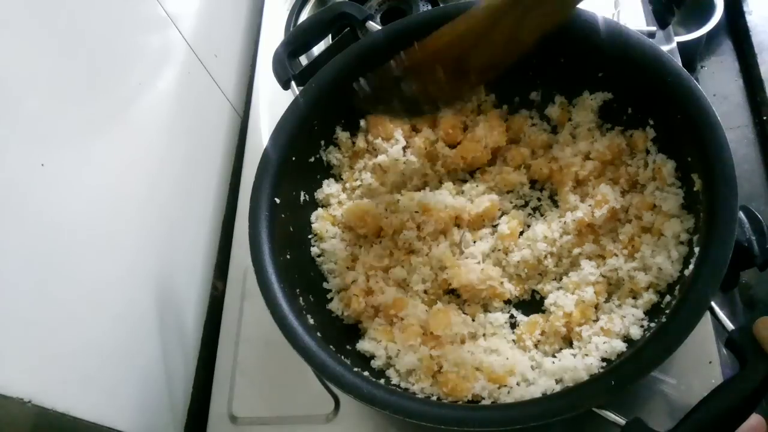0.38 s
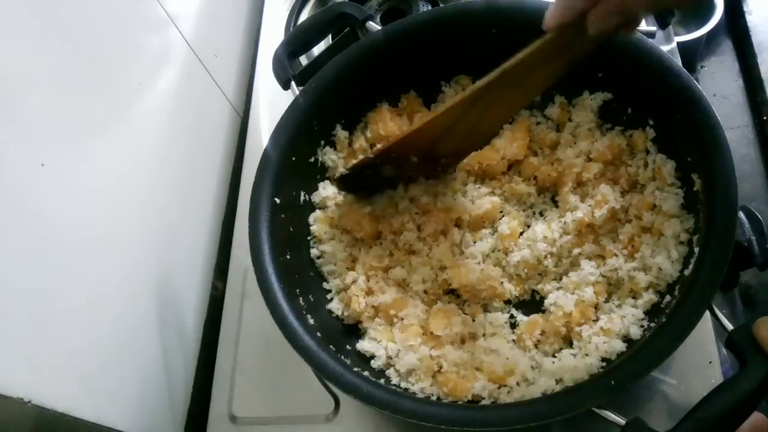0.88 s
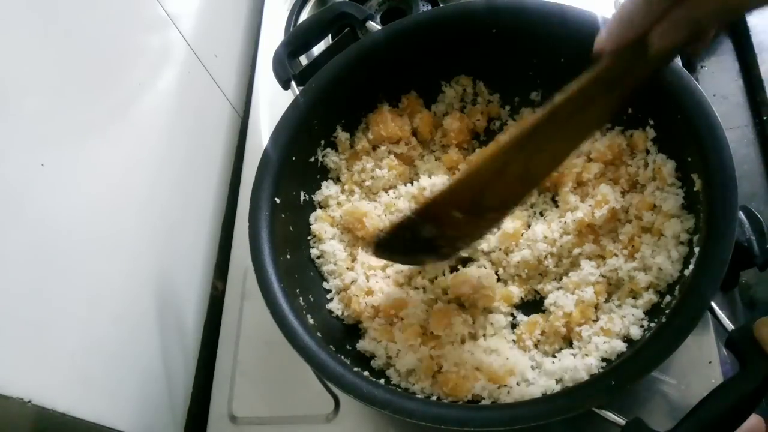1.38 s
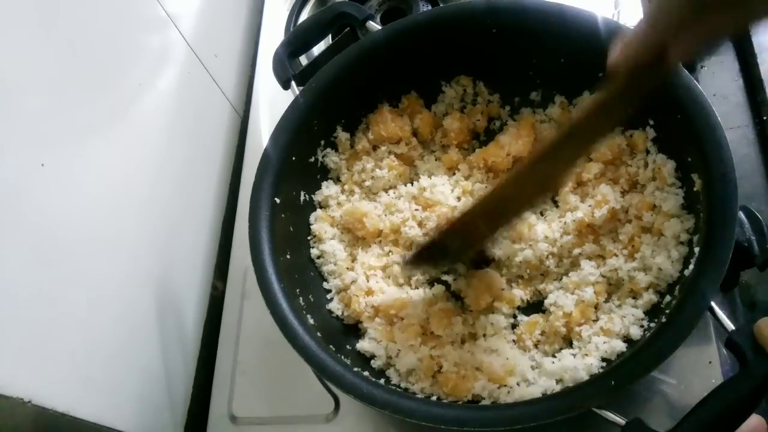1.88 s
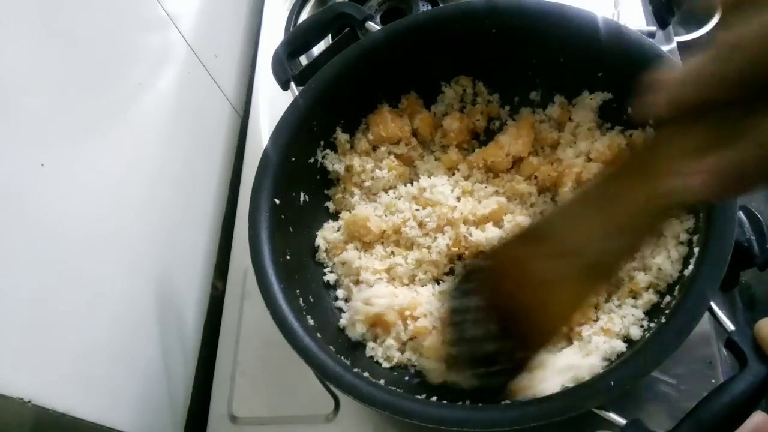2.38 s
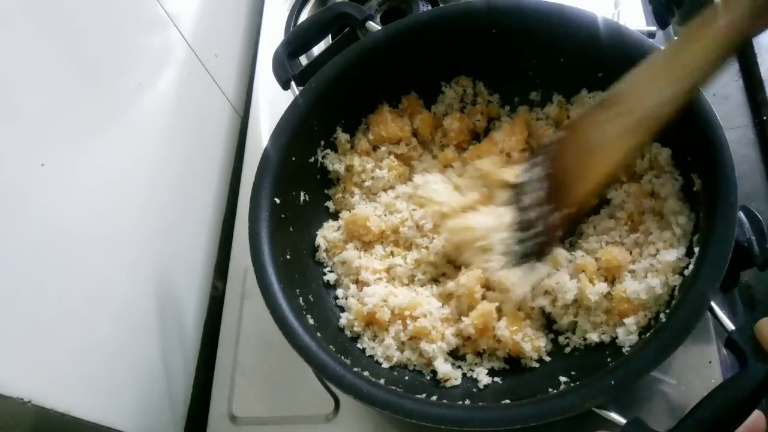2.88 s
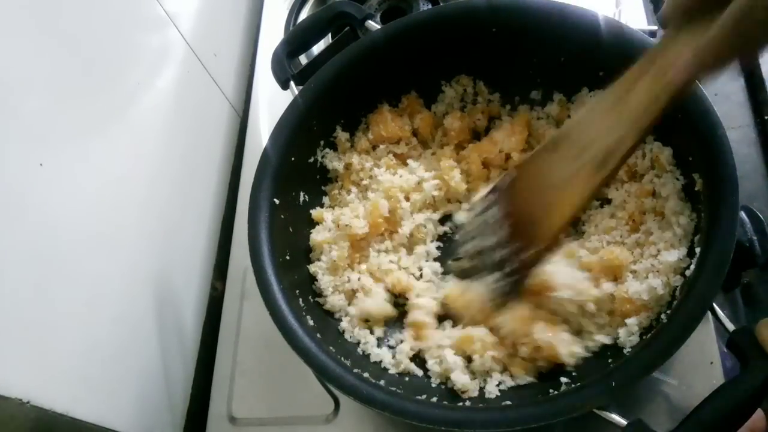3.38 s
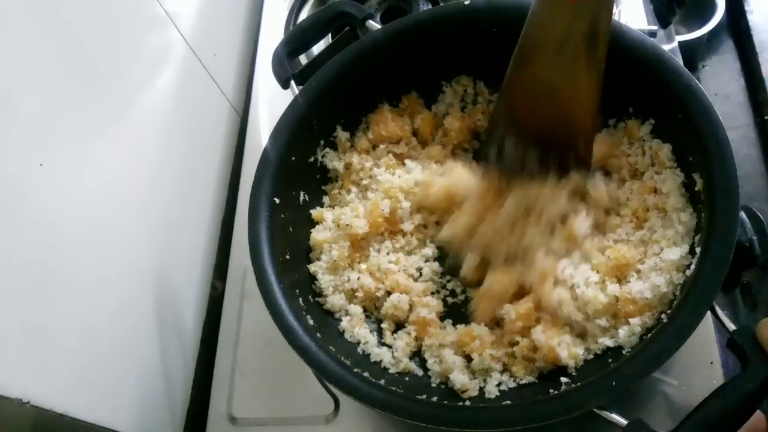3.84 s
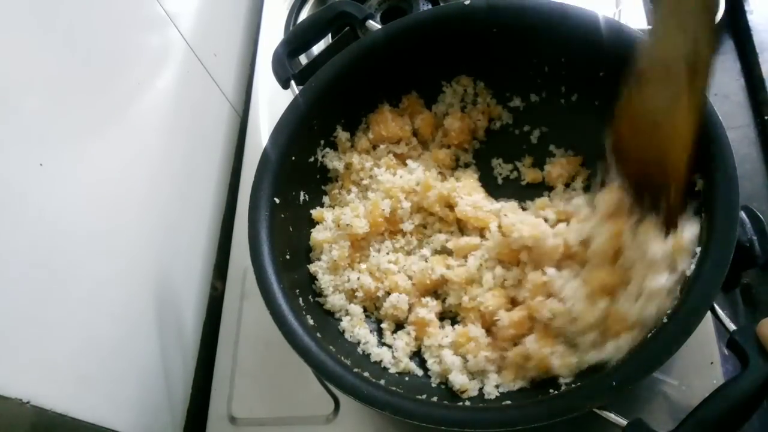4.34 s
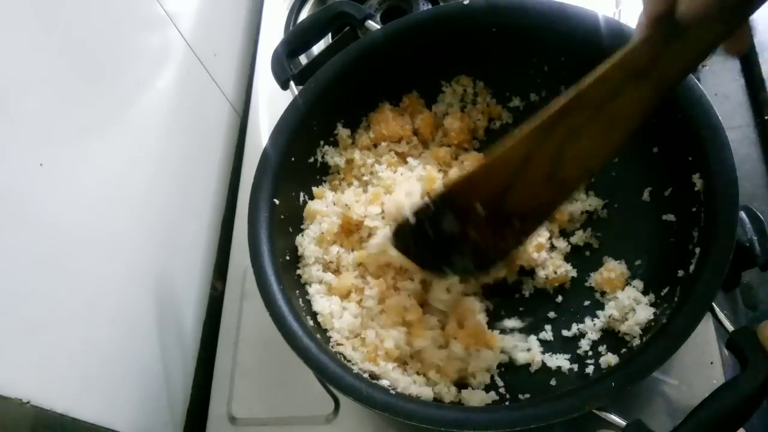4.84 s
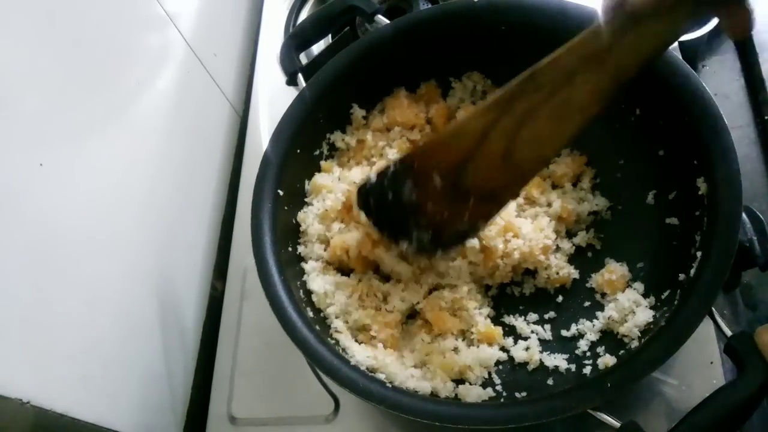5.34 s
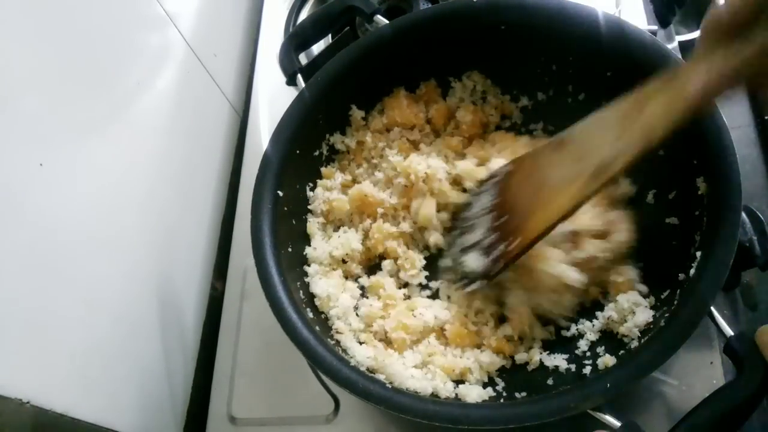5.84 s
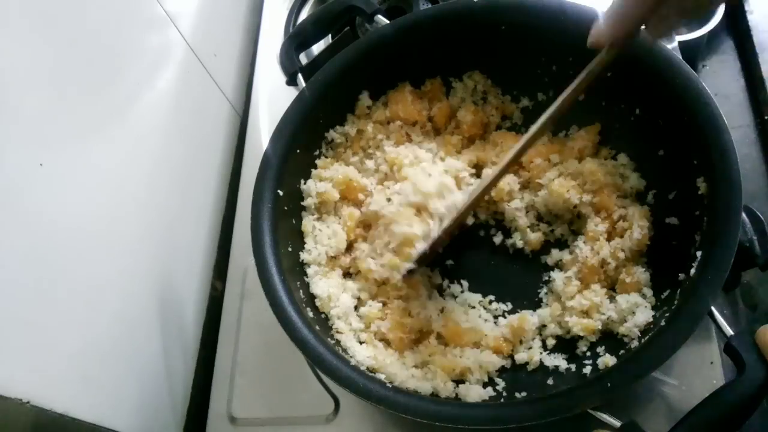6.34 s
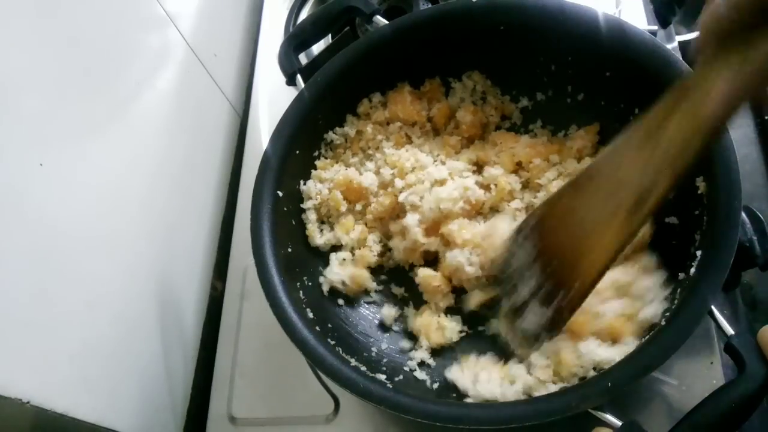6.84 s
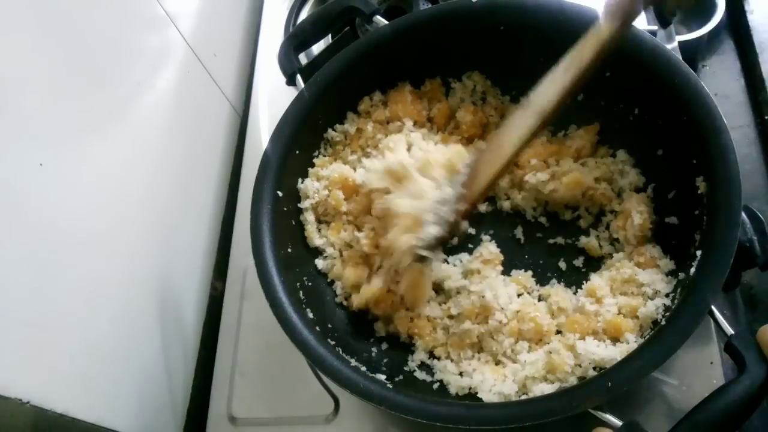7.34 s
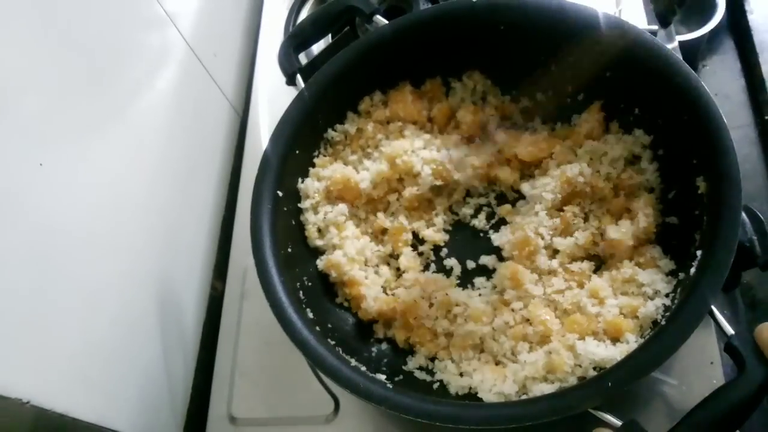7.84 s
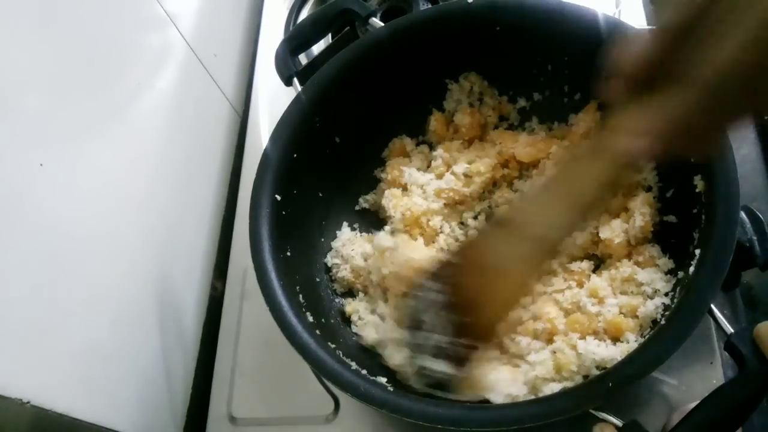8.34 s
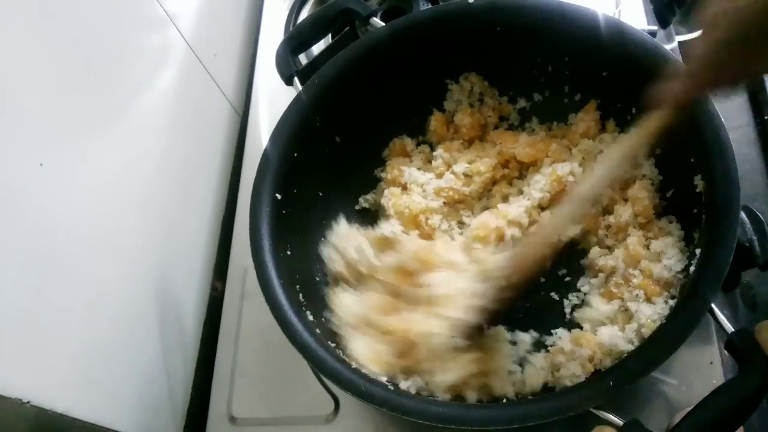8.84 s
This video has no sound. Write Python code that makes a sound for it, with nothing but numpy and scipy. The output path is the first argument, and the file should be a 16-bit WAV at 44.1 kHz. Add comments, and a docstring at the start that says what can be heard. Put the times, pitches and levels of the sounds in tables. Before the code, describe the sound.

In a small hard kitchen, a wooden spatula knocks a coated pan with short, dry, hollow clacks, first spaced taps, then quicker stirring. Grainy crumbs swish under the blade between knocks, with a loud scrape near seven seconds and a clattering cluster around eight. Low room hum and soft burner hiss continue beneath. The microphone is close above, and the hardest hits distort slightly.

```python
"""A wooden spatula stirs grated coconut in a pan on a gas stove, in a small hard kitchen, a phone just above.
Throughout, filtered noise gives the room hum, burner hiss, breathy tone and distant rumble; dense grains the crumbs.
From 0.18 s to 8.84 s, knocks excite modes of pan and blade, with cracks of noise; drags feed the pan random slips.
Noise tails return the pan's sound as an echo, and the hardest knocks are clipped."""
import sys
import numpy as np
from scipy import signal
from scipy.fft import rfft, irfft
from scipy.io import wavfile
from scipy.ndimage import uniform_filter1d

SR = 44100
rng = np.random.default_rng(int(sys.argv[2]) if len(sys.argv) > 2 else 0)


def how_loud(loudness_db):
    """Turn decibels into a plain amplitude multiplier (0 dB gives 1, 20 dB gives 10)."""
    steps = np.asarray(loudness_db, float) / 20
    return 10 ** steps


def dump_mix(stems):
    """Bounce the given channels to the path in sys.argv[1] as a 16-bit WAV at rate SR."""
    frames = np.atleast_2d(stems).T  # one column per channel
    limited = np.clip(frames, -1, 1)  # hard clip at full scale
    pcm = np.round(limited * 32767).astype(np.int16)
    wavfile.write(sys.argv[1], SR, pcm)


N = 406161

# Knocks of the spatula. Each row: time in seconds, pan floor level in dB, spot from 0 (middle) to 1 (rim),
# blade edge level in dB, blade flat level in dB; levels are relative.
KNOCK_TABLE = [(.182, -21, 0.6, -14.5, -26), (0.553, -29.5, 0, -41, -51), (1.274, -42, .7, -32, -45),
               (1.314, -24.5, 0.43, -24, -33), (1.407, -21, 0.41, -13, -23), (1.779, -37, 0.38, -44, -51),
               (1.928, -18.5, .4, -11.5, -19), (2.2916, -31, 0.47, -41, -45),
               (2.3244, -26, 0.17, -33, -29.5), (2.503, -26, 0.37, -30, -35), (2.526, -36.5, .45, -30, -37),
               (3.02, -41, 0.6, -36, -41), (3.372, -32, 0.37, -33, -31.5), (3.4911, -20.5, 0.31, -10, -17),
               (3.7422, -28.5, 0.98, -11.5, -24), (4.1548, -22.5, 0.95, -10.5, -20),
               (4.612, -30.5, 0.36, -30.5, -28), (5.201, -26.5, 0.14, -32, -33),
               (5.391, -21, 0.39, -17.5, -32), (5.705, -27, 0.2, -30.5, -51), (5.9621, -26.5, 0, -41, -49),
               (5.979, -27.5, 0.35, -36, -46), (6.317, -49, .6, -32, -61), (6.7175, -34, 0.52, -38, -39),
               (6.935, -26, .2, -45, -40), (7.031, -39, .1, -47, -59), (7.285, -42, .6, -32.5, -54),
               (7.684, -33, 0.35, -37, -46), (7.7914, -22.5, 0.34, -39, -52),
               (7.8691, -30.5, 0.23, -29, -56), (8.068, -32, 0.905, -35, -42), (8.134, -20, 0.9, -38, -19),
               (8.154, -29.5, .6, -42, -48), (8.5153, -26, 0, -34.5, -40), (8.839, -50, 0, -33, -49)]


def level(x, db):
    """Root-mean-square normalisation: scale a signal to an rms level in dB."""
    return x * how_loud(db) / np.sqrt(np.mean(x ** 2))


def curve(table):
    """Linear interpolation of a (seconds, dB) table, one value per sample."""
    seconds, db = np.transpose(table)
    return np.interp(np.arange(N) / SR, seconds, db)


def colour(x, spectrum):
    """Minimum-phase filtering by (Hz, dB) points: the folded cepstrum lets nothing sound before a blow."""
    hz, db = np.transpose(spectrum)
    size = 4096
    log_hz = np.log(np.fft.rfftfreq(size, 1 / SR) + 1)
    log_gain = np.log(how_loud(np.interp(log_hz, np.log(hz), db)))
    cepstrum = irfft(log_gain)
    cepstrum[1:size // 2] *= 2
    cepstrum[size // 2 + 1:] = 0
    response = irfft(np.exp(rfft(cepstrum)))
    return signal.fftconvolve(x, response)[:len(x)]


def ring(push, hz, t60):
    """Damped resonance: a unit blow gives one mode a fading sine that starts from amplitude 1."""
    radius = np.exp(-np.log(1000) / (max(t60, .01) * SR))
    angle = 2 * np.pi * hz / SR
    return signal.lfilter([np.sin(angle)], [1, -2 * radius * np.cos(angle), radius ** 2], push)


def walk(rate):
    """Slow random modulation: levels held 1 / rate s and smoothed twice, with a spread of about 0.7."""
    hold = int(SR / rate)
    steps = np.repeat(rng.standard_normal(N // hold + 1), hold)
    return uniform_filter1d(uniform_filter1d(steps, hold), hold)[:N]


def grains(rate, spread_db):
    """Shot noise: tiny slips at random moments (rate per second), most small, a few large; rms 1."""
    size = how_loud(spread_db * rng.exponential(size=N)) * rng.standard_normal(N)
    return level(size * (rng.random(N) < rate / SR), 0)


def strokes(table, first_idle_db, second_idle_db):
    """Power addition: every stroke swells to its peak and fades over a steady idle; two level tracks in dB."""
    t = np.arange(0, N, 64) / SR
    peak, rise, fall, *columns = np.transpose(table)[:, :, None]
    distance = np.where(t < peak, (peak - t) / rise.clip(.01), (t - peak) / fall.clip(.01))
    fade = -10 * distance ** 1.55  # a stroke is 10 dB down one rise or fall time away from its peak
    tracks = []
    for db, idle_db in zip(columns, (first_idle_db, second_idle_db)):
        power = np.sum(how_loud(db + fade) ** 2, axis=0) + how_loud(idle_db) ** 2
        tracks.append(np.interp(np.arange(N) / SR, t, 10 * np.log10(power)))
    return tracks


def kitchen():
    """Filtered noise: slightly swelling room hum and burner hiss, the burner's breathy tone, a distant rumble."""
    # Spectrum of room and burner. Each row: frequency in Hz, relative level in dB.
    hum_spectrum = [(15, -45), (25, -22), (48, -51), (157, 0.5), (212, -6), (384, 4), (641, -5.5),
                    (887, -1.5), (1610, -6.5), (1790, -6.5), (2690, -12.5), (4250, -8), (8140, -21),
                    (14800, -25.5), (16000, -32)]
    # Narrow breathy tone of the burner. Each row: time in seconds, relative level in dB.
    burner_track = [(0.0, -52), (1.33, -52.5), (1.6, -61.5), (4.4, -55), (5, -64), (9.21, -66)]
    # Distant rumble through the walls. Each row: time in seconds, relative level in dB.
    rumble_track = [(0.0, -52.5), (0.25, -54), (2.0, -56), (2.3, -61.5), (7.7, -63), (7.9, -57), (8.7, -68),
                    (9.21, -59)]
    # Spectrum of that rumble. Each row: frequency in Hz, relative level in dB.
    rumble_spectrum = [(18, -46), (30, -24), (43, -3.5), (70, -2), (91, 5), (167, 2.5), (200, -1.5),
                       (260, -24), (440, -120)]
    burner_hz, burner_width_hz = 1814, 92

    hum = level(colour(rng.standard_normal(N), hum_spectrum), -45.5) * how_loud(0.12 * walk(4.4))
    # a resonance's bandwidth is inverse to its decay time
    breath = ring(rng.standard_normal(N), burner_hz, np.log(1000) / (np.pi * burner_width_hz))
    breath = level(breath, 0.62) * how_loud(curve(burner_track))
    rumble = level(colour(rng.standard_normal(N), rumble_spectrum), -1.0)
    rumble = rumble * how_loud(curve(rumble_track) + walk(4.87))
    return hum + breath + rumble


def echo(x):
    """Diffuse reverberation: hard walls and worktop return a dense late tail, its pattern wandering at random."""
    # Spectrum of the returned sound. Each row: frequency in Hz, relative gain in dB.
    echo_spectrum = [(150, -12.5), (400, 0.5), (1200, 3), (2700, -2), (4300, -2), (7000, 4), (16000, 31.5)]
    t60_s, build_up_s, echo_db = 0.41, 0.0036, -3.5

    t = np.arange(SR // 2) / SR
    paths = np.array([walk(4) for _ in range(4)])
    paths = paths / np.sqrt(np.sum(paths ** 2, axis=0))  # constant total power
    envelope = how_loud(-60 * t / t60_s) * (1 - np.exp(-t / build_up_s))
    tails = rng.standard_normal((len(paths), len(t))) * envelope
    tails = tails / np.sqrt(np.sum(tails ** 2, axis=1, keepdims=True))  # unit energy
    returned = signal.fftconvolve(x * paths, tails, axes=1)[:, :N].sum(axis=0)
    return how_loud(echo_db) * colour(returned, echo_spectrum)


def crumbs():
    """Granular friction: dry crumbs slide over the coating as dense, slightly patchy grains."""
    # Sweeps through the crumbs. Each row: time when fastest in seconds, rise in seconds, fall in seconds,
    # crumb hiss level in dB, bright scrape level in dB.
    sweeps = [(.53, 0.075, 0.16, -48, -46), (.92, 0.028, 0.034, -41, -41.5), (1.03, 0.075, .1, -50, -48),
              (1.4, 0.36, .5, -51, -51), (1.9, 0.41, .5, -62, -52.5), (2.45, 0.52, 0.39, -46, -46.5),
              (2.97, 0.16, .13, -42.5, -44.5), (3.45, 0.14, 0.72, -43, -49), (3.9, 0.1, 0.05, -37, -44),
              (4.58, 0.54, 0.54, -44.5, -48), (5.3, 0.14, 0.27, -43.5, -49), (5.8, 0.26, 0.78, -40.5, -47),
              (6.3, 0.093, 0.067, -39, -45.5), (6.76, 0.04, 0.093, -40, -44), (6.89, 0.1, .1, -30.5, -30.5),
              (7.27, 0.19, 0.12, -44.5, -51), (7.8, 0.15, 0.079, -43, -43.5),
              (7.92, 0.081, 0.07, -38.5, -52), (8.12, .05, 0.11, -34, -45), (8.45, 0.6, 0.26, -44, -47.5),
              (8.9, 0.12, 0.086, -40.5, -48.5)]
    # Spectrum of the hiss. Each row: frequency in Hz, relative level in dB.
    hiss_spectrum = [(900, -18), (1500, -11.5), (2040, -12), (2800, -16), (3600, -3.5), (4170, 1.5),
                     (4900, -9), (5800, -41), (8000, -34)]
    # Spectrum of the bright scrape. Each row: frequency in Hz, relative level in dB.
    scrape_spectrum = [(3000, -36), (4000, 7), (5400, 4.5), (6550, -2.5), (7300, -3.5), (8050, -14.5),
                       (9900, -11.5), (11300, -17.5), (12200, -24), (14700, -14), (16000, -46)]

    # between strokes the blade still stirs a little
    hiss_db, scrape_db = strokes(sweeps, first_idle_db=-51, second_idle_db=-58)
    hiss = level(colour(grains(25000, 0.63), hiss_spectrum), 0) * how_loud(hiss_db + 2.2 * walk(25))
    scrape = level(colour(grains(25000, 0.58), scrape_spectrum), 0) * how_loud(scrape_db + 0.1 * walk(5.8))
    return hiss + scrape


def blows():
    """Position-dependent excitation: levels in dB that each knock gives floor, wall, rim, blade edge and flat."""
    # A blow nearer the edge wakes the wall, then the rim. Each row: spot from 0 (middle) to 1 (rim),
    # wall level above the floor in dB, rim level above the floor in dB.
    reach_table = [(0, -34, -32), (.6, 3.5, -39.5), (1, -5.5, 24)]
    _, floor, spot, edge, flat = np.transpose(KNOCK_TABLE)
    reach, wall, rim = np.transpose(reach_table)
    return floor, floor + np.interp(spot, reach, wall), floor + np.interp(spot, reach, rim), edge, flat


def clicks():
    """Broadband impact: each knock cracks for a millisecond or two, some extra sharply, then the pan rattles."""
    # Extra cracks, mostly on the knocks. Each row: time in seconds, relative level in dB.
    extra_cracks = [(.182, -2.5), (1.274, -31), (2.5037, -19), (5.3905, -39), (7.1005, -21), (7.7913, -14),
                    (7.869, -27), (8.067, -8.5), (8.135, -8), (8.515, -20), (8.839, -37)]
    # Spectrum of a crack. Each row: frequency in Hz, relative level in dB.
    crack_spectrum = [(180, -17), (300, 2), (689, 11.5), (1900, 2), (3760, 9.5), (6100, -9), (6740, -9),
                      (8940, -26), (9880, -23), (16000, -56)]

    out, t = np.zeros(N), np.arange(8000) / SR
    _, _, rim, edge, _ = blows()
    knock_s = np.array(KNOCK_TABLE)[:, 0]
    cracks = list(extra_cracks) + list(zip(knock_s, np.maximum(edge + 2.0, rim - 5.0)))
    noise = rng.standard_normal((len(cracks), len(t)))
    snap = noise * (np.exp(-t / 0.00051) + how_loud(-7.5) * np.exp(-t / 0.0043))
    snap = snap / np.sqrt(np.mean(snap[:, :60] ** 2, axis=1, keepdims=True))  # rms 1 at the onset
    rattle = noise * np.exp(-t / 0.045)  # of the pan on the grate
    sounds = how_loud(-16) * snap + how_loud(-23.5) * rattle
    for (seconds, db), sound in zip(cracks, sounds):
        at = int(seconds * SR)
        out[at:at + len(t)] += how_loud(db) * sound
    return colour(out, crack_spectrum)


def struck(modes, blow_db, drag, chatter_s, chatter_db):
    """Modal superposition: knocks (a blow and a short uneven chatter) and drags excite a set of modes."""
    spot_db = 1.5  # each knock lands on another spot, so a mode's share changes by this spread
    at = (np.array(KNOCK_TABLE)[:, 0] * SR).astype(int)
    t = np.arange(2000) / SR
    share = rng.standard_normal((len(at), len(modes)))
    chatter = rng.standard_normal((len(at), len(t))) * np.exp(-t / chatter_s)
    chatter = how_loud(chatter_db) * chatter / np.sqrt(np.sum(chatter ** 2, axis=1, keepdims=True))
    jolt = chatter + (t == 0)  # the blow itself is a unit impulse
    out = 0
    for k, (hz, db, t60) in enumerate(modes):
        push = drag.copy()
        push[at[:, None] + np.arange(len(t))] += jolt * how_loud(blow_db + spot_db * share[:, k])[:, None]
        out = out + how_loud(db) * ring(push, hz, t60)
    return out


def pan():
    """Impact and stick-slip excitation: knocks ring pan and blade, drags the pan; food cushions floor blows."""
    # Modes of the loaded floor. Each row: frequency in Hz, relative level in dB, 60 dB decay in seconds.
    floor_modes = [(276.6, -6, 0.23), (331.4, -8.5, 0.08), (401.4, -2.5, 0.059), (470, -3.5, 0.055),
                   (540, -3.5, 0.043), (594, -10, 0.019), (679, -5, 0.028), (785, -25, 0.036)]
    # Modes of the wall. Each row: frequency in Hz, relative level in dB, 60 dB decay in seconds.
    wall_modes = [(1005, -2, 0.055), (1153, 7, 0.033), (1241, -12.5, 0.29), (1510, -17, 0.084)]
    # Modes of the free rim. Each row: frequency in Hz, relative level in dB, 60 dB decay in seconds.
    rim_modes = [(409.2, -14, 0.41), (1859, -10.5, 0.16), (3128, -1.5, 0.088), (3286, 0.5, 0.03),
                 (3540, -23, 0.025), (4340, 3, 0.013), (5380, -15, 0.044), (6000, -22, 0.036)]
    # Modes of the blade's edge. Each row: frequency in Hz, relative level in dB, 60 dB decay in seconds.
    edge_modes = [(3650, 2, .013), (4280, -3, .011), (4885, -8, .01), (5550, -11, .01)]
    # Modes of the blade's flat. Each row: frequency in Hz, relative level in dB, 60 dB decay in seconds.
    flat_modes = [(2082, 0, .04), (2425, -1, .02)]
    # Blade dragged along the pan. Each row: time when hardest in seconds, rise in seconds, fall in seconds,
    # relative level on the floor in dB, relative level on the wall in dB.
    drags = [(.3, .3, .4, -41.5, -40.5), (2.31, 0.032, 0.15, -26, -34), (2.43, 0.076, 0.086, -27.5, -27),
             (2.97, 0.3, .2, -41.5, -45), (3.93, 0.14, 0.02, -32, -48), (4.35, 0.26, 0.2, -40.5, -45),
             (5.38, 0.058, 0.073, -36, -57), (5.9, .15, 0.11, -40, -51), (6.3, .15, .12, -54, -44),
             (6.755, 0.034, 0.04, -18.5, -30), (6.96, 0.061, 0.068, -29, -35),
             (7.8, 0.065, 0.33, -32.5, -41), (8.42, 0.074, 0.057, -24, -24),
             (8.52, 0.014, 0.028, -23.5, -47), (8.87, 0.055, 0.13, -56, -36.5)]
    # Soft contact of wood on a coated pan: little treble gets into the modes.
    # Each row: frequency in Hz, gain in dB.
    contact_spectrum = [(100, -8), (5500, -0.5), (8000, -9), (16000, -57)]

    floor, wall, rim, edge, flat = blows()
    floor_db, wall_db = strokes(drags, first_idle_db=-46.5, second_idle_db=-71)
    still = np.zeros(N)
    wall_drag = how_loud(wall_db - 35.0) * grains(1500, 2.5)
    floor_drag = how_loud(floor_db - 29.5) * grains(1200, 2.5)
    parts = struck(floor_modes, floor, floor_drag, chatter_s=0.013, chatter_db=4.5)
    parts = parts + struck(wall_modes, wall, wall_drag, chatter_s=0.06, chatter_db=-14.5)
    parts = parts + struck(rim_modes, rim, how_loud(-3) * wall_drag, chatter_s=0.003, chatter_db=-15)
    parts = parts + struck(edge_modes, edge, still, chatter_s=0.0047, chatter_db=2.5)
    parts = parts + struck(flat_modes, flat, still, chatter_s=0.0014, chatter_db=0.5)
    # a pan this small hardly radiates bass below 274 Hz
    radiation = signal.butter(4, 274, "high", fs=SR, output="sos")
    return signal.sosfilt(radiation, colour(parts, contact_spectrum) + clicks())


def scene():
    """Linear superposition: the pan with its echo and the crumbs, over the kitchen hum."""
    near = pan()
    mix = near + echo(near) + crumbs() + kitchen()
    return mix[None]


def roll_off(x):
    """The treble ends steeply here."""
    return signal.sosfilt(signal.butter(12, 16900, fs=SR, output="sos"), x)


def record(dry):
    """Hard clipping: the hardest knocks overload the phone's input."""
    clip_level = .72  # of full scale
    finished = np.clip(dry, -clip_level, clip_level)
    return roll_off(finished)


dry = scene()
out = record(dry)
dump_mix(out)
```